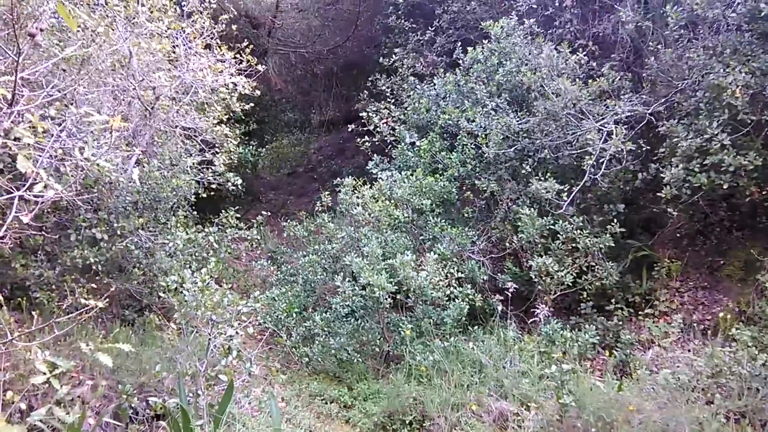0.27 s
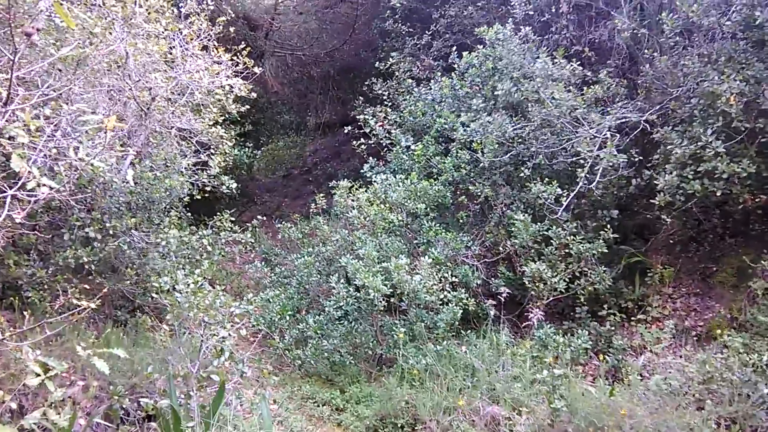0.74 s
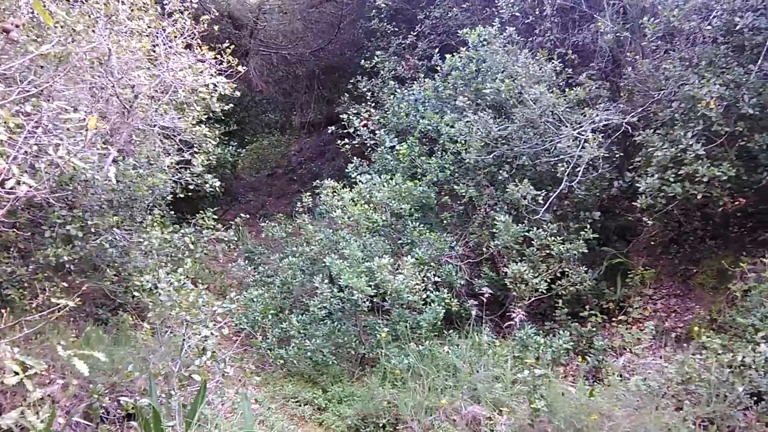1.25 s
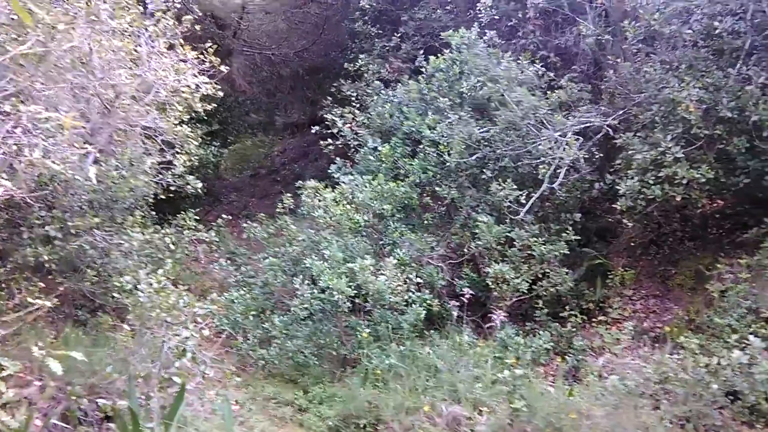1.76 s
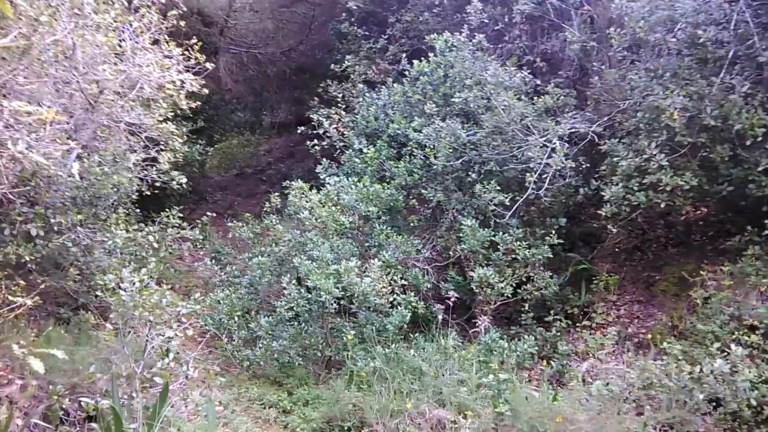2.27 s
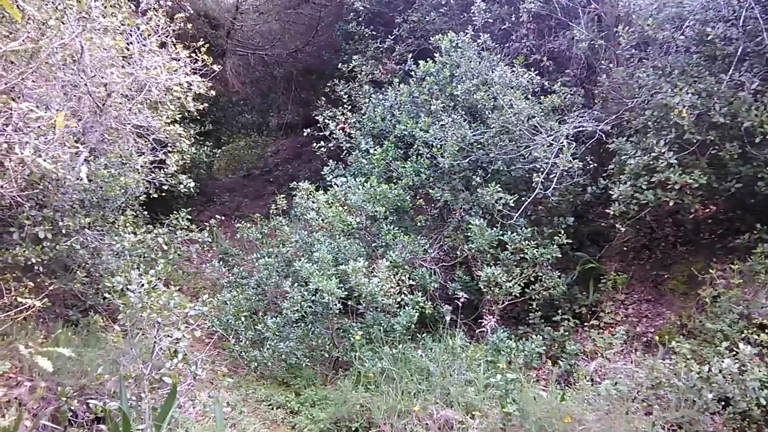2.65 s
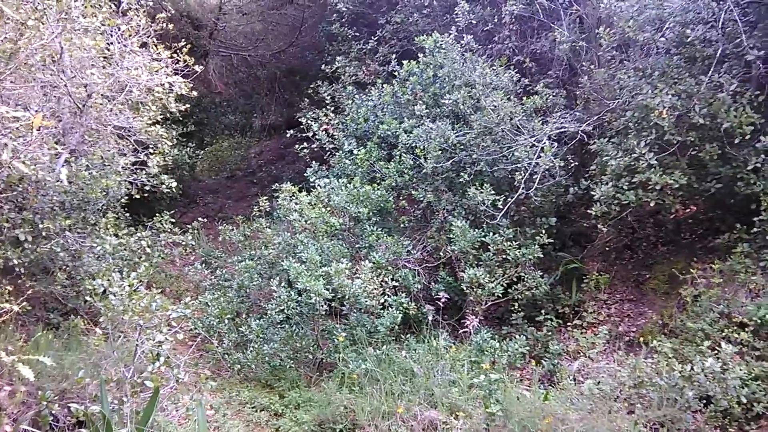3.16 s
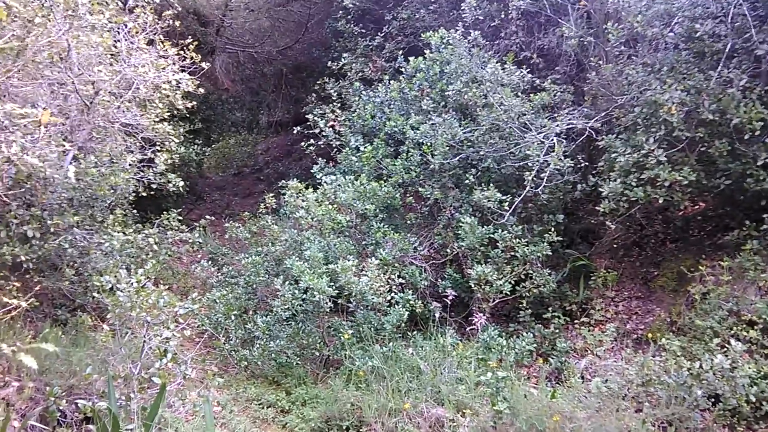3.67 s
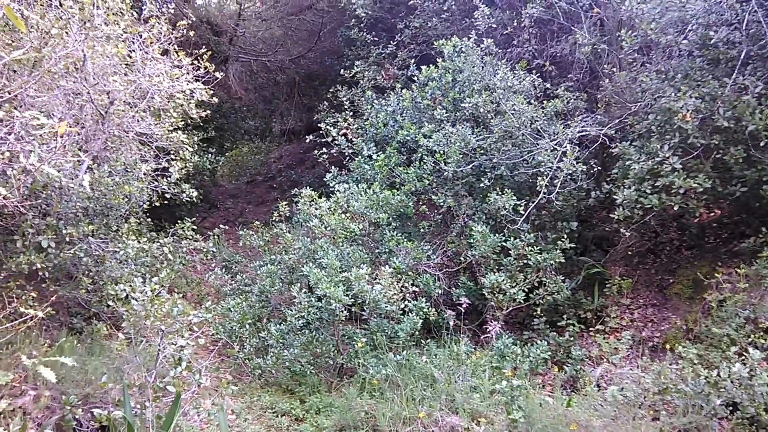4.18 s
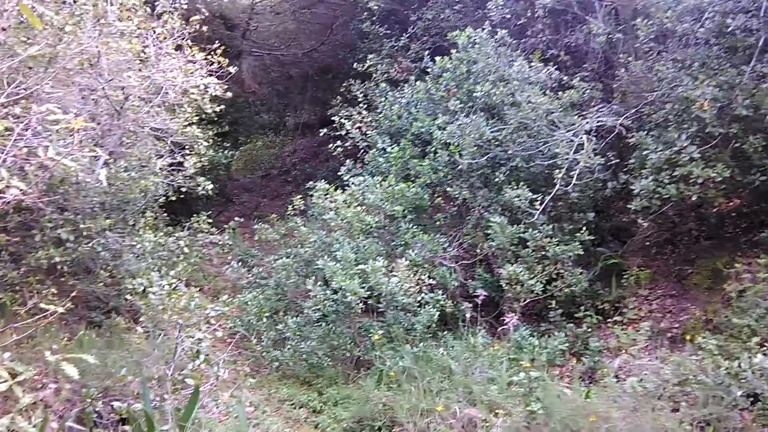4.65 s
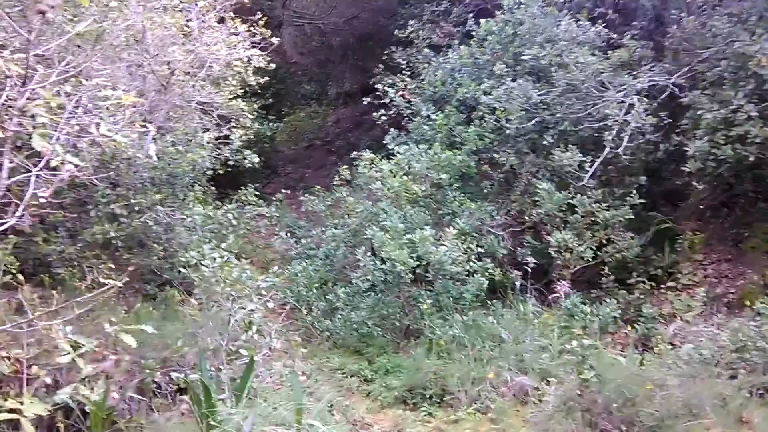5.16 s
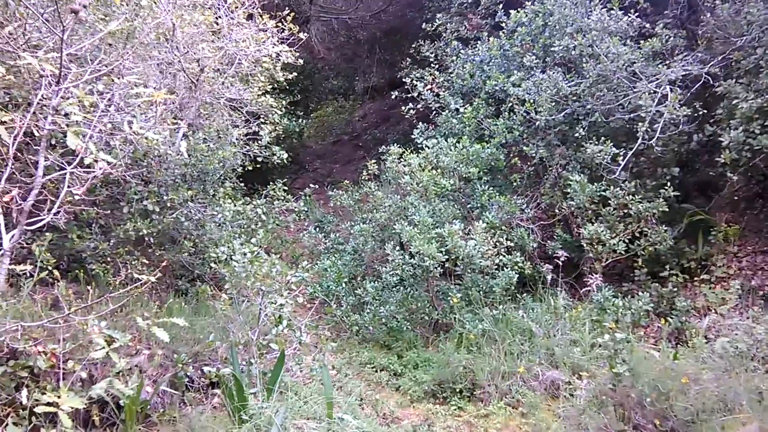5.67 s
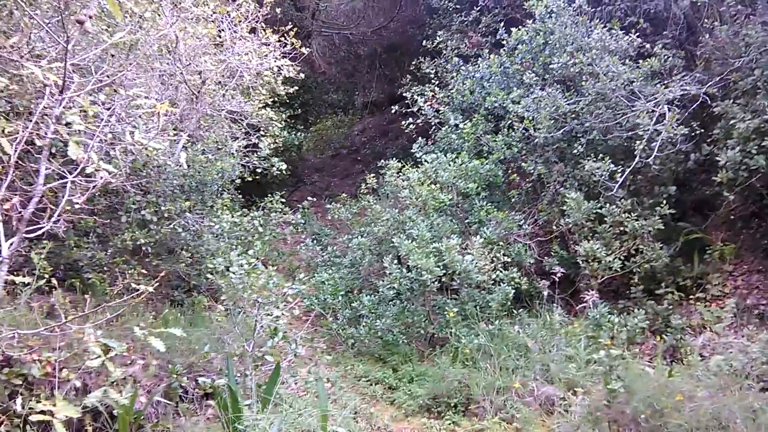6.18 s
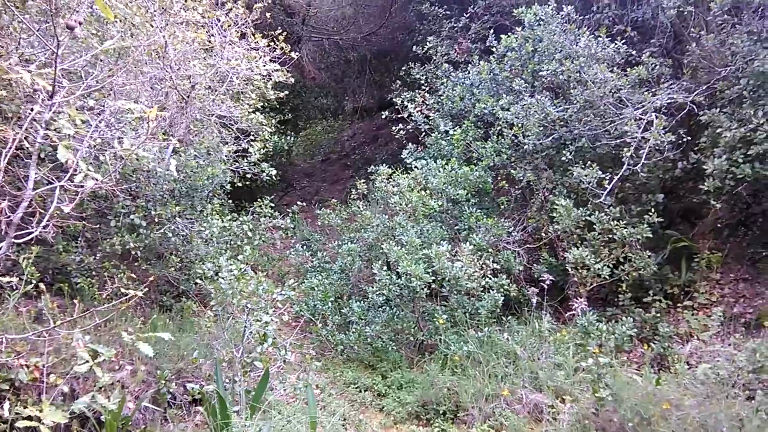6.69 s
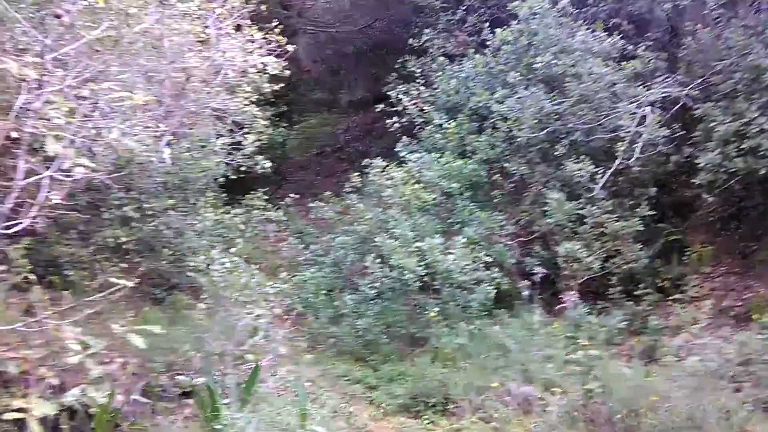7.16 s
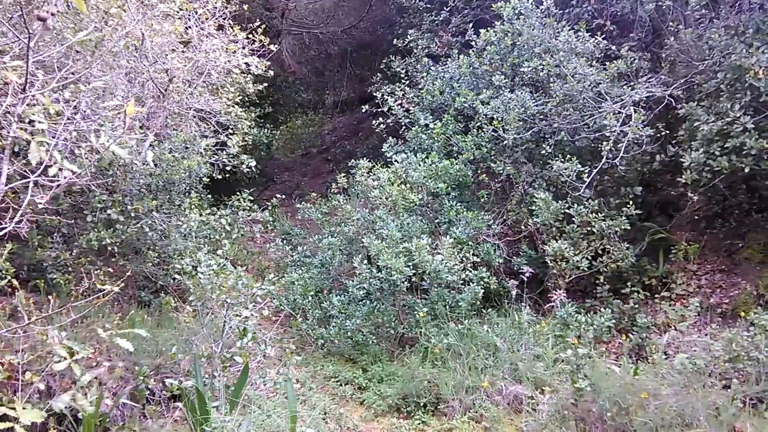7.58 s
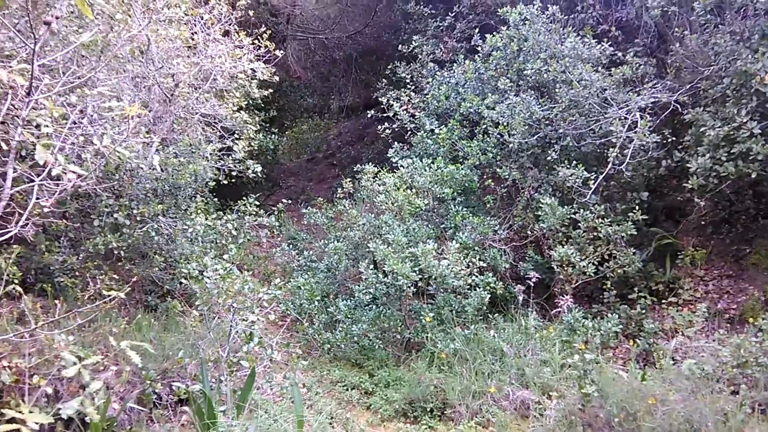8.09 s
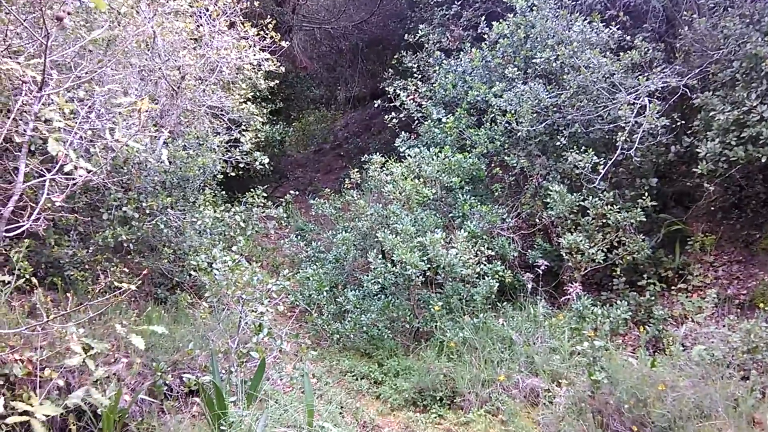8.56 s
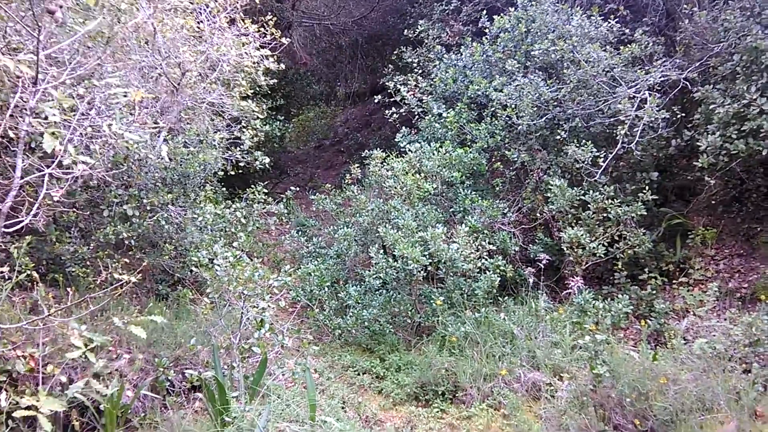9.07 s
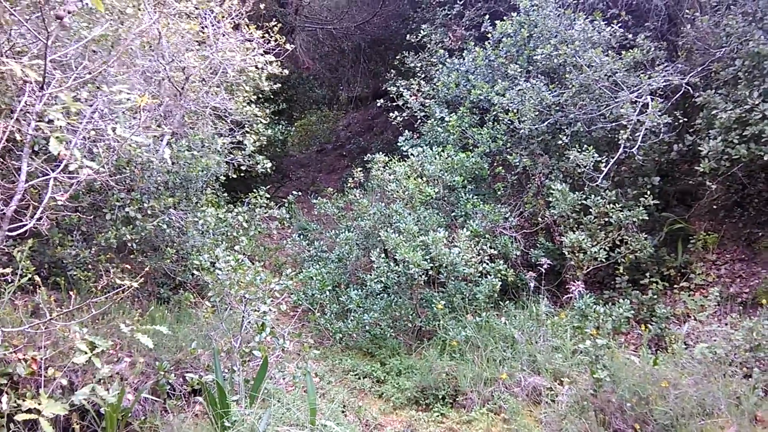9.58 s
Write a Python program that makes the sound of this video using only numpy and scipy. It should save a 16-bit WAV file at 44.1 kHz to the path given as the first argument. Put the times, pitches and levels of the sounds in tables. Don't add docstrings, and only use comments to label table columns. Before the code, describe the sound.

Scrubland, handheld bare microphone. From 0 to 1.4 s there is only soft, dull valley air, slight low rumble, tiny leaf ticks and a thin far chirp at 0.8. At 1.4 a distant hound squeals and breaks into a hoarse bark, again at 1.95, with fainter cries around 2.4 and 2.75. From 3.2 a lower, rougher hound joins; short yelps, roughly 0.1 to 0.3 s long, come in quick clusters through 7 s, clearing to brief steady notes and trailing a half-second woodland echo. Close dry leaves hiss and tick more from 3.5 onward. Wind puffs stir near 6, thump at 7.05, then batter the microphone from 7.45 to 8.65 with deep distorted blows and sharp cracks, worst at 7.6 and 7.8, partly covering barks. The gust subsides; a low chirp at 8.7 and high bays at 8.9 and 9.3 finish over rustling leaves and fading rumble until 9.8.

```python
import sys
import numpy as np
from scipy import signal
from scipy.fft import rfft, irfft
from scipy.io import wavfile
from scipy.ndimage import uniform_filter1d

SR = 44100
rng = np.random.default_rng(int(sys.argv[2]) if len(sys.argv) > 2 else 0)


def volts_from_decibels(level):
    exponent = np.asarray(level, float) / 20
    return 10 ** exponent


def wav_out(sig):
    wavfile.write(sys.argv[1], SR, np.round(np.clip(np.atleast_2d(sig).T, -1, 1) * 32767).astype(np.int16))


N = 433503


def level(x, db=0):
    return x * volts_from_decibels(db) / np.sqrt(np.mean(x ** 2))


def walk(rate, size):
    hold = max(int(SR / rate), 1)
    steps = np.repeat(rng.standard_normal(size // hold + 2), hold)
    return level(uniform_filter1d(uniform_filter1d(steps, hold), hold)[:size])


def butter(x, hz, kind, order=2):
    return signal.sosfilt(signal.butter(order, hz, kind, fs=SR, output="sos"), x)


def band_noise(hz, order=2):
    return butter(rng.standard_normal(N), hz, "band", order)


def coloured(spectrum):
    hz, db = np.transpose(spectrum)
    f = np.maximum(np.fft.rfftfreq(N, 1 / SR), 1)
    gain = volts_from_decibels(np.interp(np.log(f), np.log(hz), db))
    return level(irfft(rfft(rng.standard_normal(N)) * gain, N))


def spread(start, length, peak, fade, *columns):
    t = np.arange(0, length, 1 / SR)
    edge = np.clip(np.minimum(t, length - t) / fade, 0, 1)
    curves = [np.interp(t, [0, peak, length], c) for c in columns]
    return int(start * SR), np.sin(np.pi / 2 * edge) ** 2, curves


def phase(hz):
    return 2 * np.pi * np.cumsum(hz) / SR


def add(out, start, x):
    out[start:start + len(x)] += x[:len(out) - start]


# start_s, length_s, peak_pitch_hz, end_pitch_hz, level_db
SCOOPED_SQUEALS = [(1.385, 0.092, 1402, 1358, -31), (2.395, 0.11, 1342, 1290, -39),
                   (2.715, 0.11, 1393, 1410, -35), (2.77, 0.13, 1525, 1516, -43),
                   (3.77, 0.025, 960, 970, -41.5), (4.255, 0.047, 992, 990, -32),
                   (5.097, 0.047, 996, 985, -27), (6.903, 0.05, 1010, 943, -29.5),
                   (6.645, 0.069, 938, 648, -24.5), (6.47, 0.074, 847, 850, -45.5),
                   (8.695, 0.047, 990, 850, -45), (9.33, 0.056, 1487, 1390, -36)]
# start_s, length_s, peak_pitch_hz, end_pitch_hz, level_db
LEAPING_SQUEALS = [
    (1.938, 0.063, 1498, 1470, -32.5),
    (7.43, .12, 1633, 1348, -26),
    (8.856, 0.1, 1499, 1360, -33),
]
# start_s, length_s, peak_pitch_hz, end_pitch_hz, level_db
SLIDING_SQUEALS = [(3.155, 0.051, 1287, 1120, -40), (4.025, 0.046, 1183, 795, -37),
                   (4.285, 0.053, 1420, 1260, -35.5), (4.68, 0.036, 854, 806, -42.5),
                   (4.695, 0.11, 1500, 1220, -34), (5.12, 0.041, 1443, 1390, -34.5),
                   (5.592, 0.043, 955, 885, -31.5), (6.075, 0.06, 825, 702, -30),
                   (6.19, 0.05, 795, 600, -33), (3.528, 0.03, 1280, 1160, -42.5),
                   (7.315, 0.025, 1580, 1640, -37.5), (8.228, 0.026, 1150, 1010, -44)]


def squeals():
    out = np.zeros(N)
    # table, opening pitch as a share of the peak pitch, octave trim in dB
    kinds = ((SCOOPED_SQUEALS, .93, 0), (LEAPING_SQUEALS, .88, 0), (SLIDING_SQUEALS, 1.13, -3))
    for table, opening, dull_db in kinds:
        for s, length, peak_hz, end_hz, peak_db in table:
            peak_s = min(0.402 * length, 0.0376)
            start, edge, (hz, db, octave_db) = spread(
                s, length, peak_s, .007,
                (opening * peak_hz, peak_hz, end_hz),
                peak_db + np.array([-11.5, 0, -12]),
                dull_db + np.array([-18, -8, -18]))
            size = len(hz)
            turn = phase(hz * (1 + 0.014 * walk(161, size)))
            upper = volts_from_decibels(octave_db) * np.sin(2 * turn) + volts_from_decibels(-37) * np.sin(3 * turn)
            distance_db = -22 if peak_db < -42 else 0
            tone = volts_from_decibels(db) * (np.sin(turn) + volts_from_decibels(distance_db) * upper)
            add(out, start, bushes(np.sqrt(2) * edge * tone * volts_from_decibels(3.07 * walk(119.3, size))))
    return out


# start_s, length_s, pitch_hz, level_db, bite_db
HIGH_BARKS = [
    (1.44, 0.12, 670.4, -28.5, -12.5),
    (3.178, .15, 707, -36.5, -4.5),
    (3.538, 0.1094, 737, -32.5, -15),
    (4.28, 0.068, 718, -47, 7),
    (4.7, 0.16, 699, -39.5, 0.5),
    (6.19, 0.076, 720, -45, 10),
    (6.67, .07, 700, -42.5, 10),
    (1.97, 0.082, 687, -33.5, -0.5),
    (7.47, 0.12, 685, -33, 2.5),
]
# start_s, length_s, pitch_hz, level_db, bite_db
HELD_BAYS = [
    (2.77, 0.063, 745, -43, -14),
    (8.885, 0.14, 688.4, -33.5, -2),
    (9.305, 0.1756, 724, -32, -4),
]
# start_s, length_s, pitch_hz, level_db, bite_db
LOW_BARKS = [(3.545, 0.13, 603, -42.5, 2.5), (3.78, 0.18, 598, -43.5, -6), (4.032, .16, 587, -36, -2),
             (4.28, 0.16, 600.6, -39.5, -7.5), (4.71, 0.19, 521.6, -48.5, 3), (5.12, 0.18, 593, -34, -3.5),
             (5.6, 0.28, 576.5, -37, 0), (6.085, 0.124, 564.5, -41, 5.5), (6.195, 0.14, 562.6, -38, -6),
             (6.922, 0.17, 547.3, -36.5, -0.5), (4.785, .13, 540.6, -42.5, 5)]
# start_s, length_s, pitch_hz, level_db, bite_db
BAYS = [
    (2.41, 0.19, 606, -48, -15),
    (3.18, 0.17, 566, -43, 6),
    (7.308, 0.17, 581, -44, 8),
    (7.75, 0.14, 589.6, -43, 7.5),
    (8.225, 0.11, 581.4, -36, 5),
    (6.52, 0.15, 585, -39.5, 0.5),
    (6.675, 0.14, 579.5, -40, 1.5),
]
# hoarseness (0-1), opening_pitch (share), opening_chest_db, closing_chest_db,
# peak (share of length), opening_db, closing_db
HIGH_VOICE = (0.9, 1.18, -9, -7, 0.22, -9.5, -12.5)
HELD_VOICE = (1, 1.21, 4.5, -12.5, 0.5, -10, -3)
LOW_VOICE = (1, 1, -0.5, -4.5, 0.48, -6.5, -10.5)
BAY_VOICE = (1.03, 0.87, 1.5, -8.5, 0.33, -1.5, -11)
THROAT = [1, 2, 3, 4, 5.2, 6.4, 9]


def barks():
    out = np.zeros(N)
    kinds = ((HIGH_BARKS, HIGH_VOICE), (HELD_BAYS, HELD_VOICE), (LOW_BARKS, LOW_VOICE), (BAYS, BAY_VOICE))
    for table, kind in kinds:
        roughness, opening_share, chest_from_db, chest_to_db, peak_share, from_db, to_db = kind
        for s, length, peak_hz, peak_db, peak_bite_db in table:
            start, edge, (hz, db, chest_db, bite_db) = spread(
                s, length, peak_share * length, .02,
                peak_hz * np.array([opening_share, 1, .97]),
                peak_db + np.array([from_db, 0, to_db]),
                (chest_from_db, (chest_from_db + chest_to_db) / 2, chest_to_db),
                peak_bite_db + np.array([8, 0, -3.5]))
            size = len(hz)
            age = np.arange(size) / SR
            hoarse = min(roughness, 1) * np.interp(np.linspace(0, 1, size), [0, .45, 1], [1, .9, .5])
            drop_in = .15 * np.exp(-age / .018)
            turn = phase(hz * (1 + drop_in + .064 * hoarse ** 2 * walk(190, size)))
            colour = np.array([chest_db, 0 * db, bite_db, bite_db - 8.0,
                               bite_db - 23, bite_db - 24.5, bite_db - 14.0])
            voice = 0
            for k in np.arange(1, 9, .5):
                place = np.interp(k, THROAT, np.arange(len(THROAT)))
                below = min(int(place), len(THROAT) - 2)
                colour_db = colour[below] + (place - below) * (colour[below + 1] - colour[below])
                gain = volts_from_decibels(colour_db + 3.16 * walk(25.4, size))
                rough = hoarse * min(k / 2, 1)
                flutter = np.sqrt(1 - rough ** 2) + rough * walk(290, size)
                opening = np.clip(age / (.007 * k), 0, 1)
                half_line = 1.1 * hoarse ** 2 if k % 1 else 1
                voice = voice + gain * opening * flutter * half_line * np.sin(k * turn + k * k)
            add(out, start, bushes(edge * volts_from_decibels(db - 2.0) * voice))
    return out


# start_s, length_s, pitch_hz, chest_db, mouth_db
CLEAR_ENDS = [(1.46, 0.089, 540, -72, -39.5), (1.715, 0.185, 500, -65.5, -59.5), (2.4, .17, 574, -54, -52),
              (2.77, 0.099, 760, -64, -45), (2.485, 0.084, 585, -50.5, -46.5),
              (2.715, 0.077, 802, -50.5, -72), (2.43, 0.071, 830, -54, -72), (3.27, 0.093, 599, -52, -46),
              (3.61, 0.073, 600, -76, -40.5), (4.1, 0.066, 583, -57, -38), (4.32, 0.11, 585, -52, -46.5),
              (5.23, 0.12, 561.4, -46, -48), (5.76, 0.11, 565, -46.5, -48), (6.22, .12, 551, -48, -50),
              (6.705, 0.07, 586.4, -37, -59), (6.96, .12, 567.5, -45, -41),
              (7.34, 0.081, 576, -39.5, -44.5), (8.29, 0.067, 550, -43, -40.5),
              (9.37, 0.1, 730, -42.5, -42)]
# start_s, length_s, pitch_hz, chest_db, mouth_db
WIDE_NOTES = [(1.97, 0.069, 693, -53, -50), (1.44, .06, 700, -51, -52), (5.61, 0.073, 680, -60, -50),
              (6.09, 0.095, 600, -61, -51), (3.8, 0.1, 582.5, -56.5, -52.5), (4.77, 0.11, 537, -50, -48.5),
              (4.86, 0.053, 600, -52, -44), (5.16, 0.12, 584, -51, -46.5), (5.66, 0.11, 586, -45.5, -48.5),
              (6.54, 0.083, 594, -45, -53), (6.72, 0.073, 563, -46, -54), (7.49, 0.069, 661, -50, -42.5)]
# start_s, length_s, pitch_hz, chest_db, mouth_db
SHOUTED_NOTES = [
    (3.185, 0.098, 560, -49.5, -47),
    (3.56, 0.096, 580, -62, -51),
    (4.07, 0.055, 576, -62, -50),
    (7.77, .11, 571, -44, -50.5),
    (8.25, 0.061, 570, -43, -48),
    (8.96, 0.094, 673, -65, -47.5),
    (6.74, 0.089, 650, -64, -57),
    (4.8, .09, 700, -62, -53.5),
]


def notes():
    out = np.zeros(N)
    kinds = ((CLEAR_ENDS, (-20.5, -21, -31.5)), (WIDE_NOTES, (-1.5, -8.5, -16.5)), (SHOUTED_NOTES, (6, -5, -9.5)))
    for table, top_db in kinds:
        for s, length, pitch_hz, chest_db, mouth_db in table:
            sag = pitch_hz * np.array([1 / .98, 1, .98])
            start, edge, (hz,) = spread(s, length, length / 2, .025, sag)
            size = len(hz)
            turn = phase(hz * (1 + .017 * walk(120, size)))
            note = np.zeros(size)
            for k, db in enumerate([chest_db, mouth_db, *(mouth_db + np.array(top_db))], 1):
                note += volts_from_decibels(db + 4 + 3.5 * walk(70, size)) * np.sin(k * turn)
            add(out, start, edge * note)
    return out


# start_s, length_s, pitch_hz, level_db
OVERTONES = [(1.418, 0.072, 4100, -60), (1.452, 0.089, 4500, -65), (1.95, 0.079, 4420, -61),
             (1.965, 0.066, 5100, -67), (1.955, 0.054, 5950, -71), (4.272, 0.085, 3200, -52),
             (4.72, 0.066, 3500, -56), (5.126, 0.086, 3300, -56), (5.689, 0.064, 3300, -56),
             (6.194, .07, 3280, -58), (6.675, .06, 3400, -59), (6.918, 0.038, 3030, -53),
             (3.178, 0.046, 4400, -69), (7.445, 0.036, 4830, -53.5), (7.532, 0.071, 5040, -57),
             (8.69, 0.04, 4700, -63), (8.969, 0.098, 3386, -52.5), (9.365, 0.096, 3500, -54.5)]


def overtones():
    out = np.zeros(N)
    for s, length, pitch_hz, db in OVERTONES:
        size = int(length * SR)
        turn = phase(pitch_hz * (1 + .01 * walk(100, size)))
        flutter = walk(600, size) * np.sin(turn) + walk(600, size) * np.cos(turn)
        add(out, int(s * SR), np.hanning(size) * volts_from_decibels(db + 2) * flutter)
    return out


def swaying(rate, size):
    return np.sqrt(.5) + np.sqrt(.5) * walk(rate, size)


def bushes(cry):
    t60_s = 0.24
    t = np.arange(int(t60_s * SR)) / SR
    echo = level(rng.standard_normal(len(t)) * volts_from_decibels(-60 * t / t60_s), -1.5) / np.sqrt(len(t))
    smear = signal.fftconvolve(cry * swaying(120, len(cry)), echo)
    add(smear, 0, cry)
    return smear / np.sqrt(2)


def scrub(x):
    return butter(x, 3500, "low", order=8) + volts_from_decibels(-13) * butter(x, (4100, 5100), "band", order=3)


def wood(x):
    t60_s = 0.52
    t = np.arange(int(1.2 * SR)) / SR
    scatter = rng.standard_normal(len(t)) * volts_from_decibels(3 * walk(40, len(t))) * (1 - np.exp(-t / .015))
    low = butter(scatter, 2170, "low", order=1)
    tail = low * volts_from_decibels(-60 * t / t60_s) + (scatter - low) * volts_from_decibels(-60 * t / (.7 * t60_s))
    echo = level(tail, -11) / np.sqrt(len(t))
    return x + signal.fftconvolve(x * swaying(150, N), echo)[:N]


# time_s, rumble_db
BREEZE = [(0, -50.5), (.3, -45.5), (1.3, -51), (1.75, -56), (2.55, -53), (3.2, -55.5), (3.5, -45),
          (4.05, -56), (5.55, -53), (6.1, -37), (6.5, -39), (6.75, -83), (7.3, -40), (8.2, -23.5),
          (8.72, -37.5), (9.3, -36.5), (9.83, -47)]
# peak_s, rumble_db, rise_s, fall_s, flutter_db
PUFFS = [(5.903, -30, 0.023, 0.16, -7.5), (6.152, -27.5, 0.22, 0.38, -6.5), (6.842, -17, 0.099, 0.036, -33),
         (7.055, -8.5, 0.049, 0.026, -26), (7.21, -20.5, 0.79, 0.38, -29), (7.482, -6.5, 0.048, 0.28, 0.5),
         (7.601, 1, 0.18, 0.015, 0), (7.666, -14, 0.071, 0.11, 12), (7.718, -3.5, 0.025, 0.24, 1),
         (7.804, -7, 0.4, 0.25, -17), (8.029, -13, 0.073, 0.1, 5), (8.15, -18, 0.038, 0.23, -5.5),
         (8.27, -27, 0.23, 0.045, -17), (8.328, -6, 0.036, 0.027, -18), (8.452, -7, 0.088, 0.097, -7),
         (8.55, -6, 0.03, 0.11, -3.5), (8.623, -8.5, 0.32, 0.12, -10.5), (8.88, -23, .1, 0.075, -26),
         (9.048, -34, 0.06, 1, -30)]


def wind():
    t = np.arange(N) / SR
    push = volts_from_decibels(np.interp(t, *np.transpose(BREEZE)))
    flap = push * volts_from_decibels(-37)
    for s, puff_db, rise, fall, lump_db in PUFFS:
        puff = volts_from_decibels(puff_db - 32 * np.maximum((s - t) / rise, (t - s) / fall))
        push = np.maximum(push, puff)
        flap = np.maximum(flap, puff * volts_from_decibels(lump_db))
    db = 20 * np.log10(push)
    strong = np.clip((db + 44.0) / 15, 0, 1)
    deep = level(band_noise([35, 72]))
    big = level(band_noise([60, 115]))
    lumps = band_noise([100, 330], order=1) * volts_from_decibels(5 * walk(45, N))
    small = level(butter(lumps, 480, "low", order=4), -5)
    eddies = (1.5 - 1.1 * strong) * deep + strong * (big + flap / push * small)
    rumble = volts_from_decibels(db - 3) * level(volts_from_decibels(2.5 * walk(22, N))) * eddies
    spit = volts_from_decibels(-52 + 4 * walk(60, N)) * np.clip(flap, 0, 1) * level(band_noise((2554, 7900)))
    return spit + rumble


# time_s, peak_db, width_ms
SLAPS = [(7.03, -11, 2.2), (7.046, -10, 1.33), (7.222, -17.5, 1.28), (7.47, -18, 1.2), (7.5, -15, 0.46),
         (7.556, -9.5, 0.41), (7.56, -5.5, 1.4), (7.569, -14, 0.43), (7.585, -3, 0.7), (7.637, -0.5, 1.46),
         (7.67, -9, 1.1), (7.683, -7.5, 0.61), (7.724, -16, 1.8), (7.736, -20, 0.84), (7.786, 1.5, 0.95),
         (7.847, -16.5, 0.32), (7.862, -8.5, 1.13), (7.904, -8, 1.35), (8.01, -12, 1.03),
         (8.033, -13, 0.89), (8.166, -14.5, 1.8), (8.186, -15.5, 1.27), (8.325, -6.5, 1.87),
         (8.332, -14.5, 0.57), (8.398, -14, 0.93), (8.406, -10, 0.42), (8.418, -10, 0.72),
         (8.443, -9.5, 0.56), (8.484, -14, 0.85), (8.49, -13, 0.8), (8.543, -6, 1.36), (8.552, -9.5, 0.87),
         (8.581, -13, 0.9), (8.597, -18, 1.8), (8.618, -13, 0.64)]
# time_s, peak_db
CRACKS = [(7.5603, -8.5), (7.5879, -12.5), (7.634, -16), (7.67, -10.5), (7.791, -3.5), (7.597, -20),
          (7.6409, -25), (7.798, -21), (8.4416, -15), (8.4502, -19), (8.546, -17.5), (8.5523, -26.5)]


def slaps():
    out = np.zeros(N)
    ms = np.arange(-10, 20, 1000 / SR)
    signs = rng.choice([-1, 1, 1], len(SLAPS))
    for (s, db, width), sign in zip(SLAPS, signs):
        peak, rebound = (np.exp(-np.sqrt(((ms - lag) / max(width, .3)) ** 2 + .2))
                         for lag in (0, 2.5 * width))
        add(out, int((s - .008) * SR), sign * volts_from_decibels(db + 14.5) * (peak - 0.24 * rebound))
    for s, db in CRACKS:
        add(out, int((s - .009) * SR), volts_from_decibels(db + 12) * np.exp(-np.sqrt((ms / .3) ** 2 + .05)))
    return butter(out, 103, "high", order=3)


# time_s, level_db
RUSTLE = [(0, -78), (.5, -71.5), (1.28, -80), (1.32, -72), (2.2, -70), (2.3, -78), (2.325, -67),
          (2.44, -70.5), (2.85, -73.5), (3.3, -67), (3.52, -60.5), (4.1, -57), (4.3, -59), (5.7, -61),
          (6.15, -59), (7.4, -58.5), (7.6, -60), (8.651, -61.5), (9.15, -65.5), (9.31, -58.5), (9.83, -73)]
# frequency_hz, density_db (per Hz)
LEAF_COLOUR = [(2240, -12.5), (3800, -14.5), (4580, -9.5), (6450, -12.5), (8610, -3), (10500, -4),
               (13800, -9), (15800, -20.5)]
# time_s, peak_db
TICKS = [(0.2293, -55), (0.3127, -48.5), (0.8173, -57), (1.4414, -51), (1.711, -52), (2.3232, -34),
         (2.345, -48), (2.365, -49), (2.587, -53), (3.4057, -51), (3.499, -51), (3.9664, -52), (4.436, -39),
         (4.5161, -39), (4.5734, -43), (4.7217, -38), (4.8359, -33.5), (5.2021, -42), (5.2485, -41.5),
         (5.3868, -34.5), (5.556, -48), (5.6166, -37), (5.6384, -33), (5.9085, -39.5), (6.1424, -37.5),
         (6.2652, -39.5), (6.7022, -34), (7.417, -43.5), (7.672, -36.5), (7.899, -35), (7.9917, -53),
         (8.2486, -45), (8.4253, -46), (8.8396, -40), (9.1925, -39.5), (9.3048, -44), (9.3596, -40.5),
         (9.4592, -36.5), (9.7032, -49), (9.7306, -47.5), (9.7535, -41.5)]


def leaves():
    grains = (rng.random(N) < 900 / SR) * volts_from_decibels(2.4 * rng.exponential(1, N) + 1.54 * walk(7.9, N))
    grains = signal.lfilter([1], [1, -.97], grains)
    stir_db = np.interp(np.arange(N) / SR, *np.transpose(RUSTLE)) + 2 * walk(8, N)
    hiss = level(coloured(LEAF_COLOUR) * (1 + .25 * grains)) * volts_from_decibels(stir_db)
    t = np.arange(int(.1 * SR)) / SR
    decay = np.exp(-t / 0.0024) + 0.36 * np.exp(-t / 0.037)
    ticks = np.zeros(N)
    for s, db in TICKS:
        add(ticks, int(s * SR), volts_from_decibels(db - 7.5) * rng.standard_normal(len(t)) * decay)
    return hiss + butter(ticks, [6500, 15700], "band") + volts_from_decibels(-13) * butter(ticks, [2500, 6000], "band")


# start_s, pitch_hz, level_db
CHIRPS = [
    (.83, 4700, -67),
    (2.72, 5000, -72),
    (2.42, 4300, -71),
    (2.925, 3340, -65),
    (8.721, 2970, -55),
]


def bird():
    out = np.zeros(N)
    chirp_s = 0.034
    t = np.arange(0, chirp_s, 1 / SR)
    for s, hz, db in CHIRPS:
        add(out, int(s * SR), volts_from_decibels(db) * np.sin(np.pi * t / chirp_s) * np.sin(2 * np.pi * hz * t))
    return out


# frequency_hz, density_db (per Hz)
VALLEY_COLOUR = [(110, -13.5), (180, -2), (280, -1), (736, -3.5), (1250, -11), (1910, -17.5), (6000, -39.5),
                 (9000, -82.5)]
# time_s, level_db
FAR_SWELL = [(0, 3), (1.2, 4.5), (3, 3), (5.5, 3), (9.83, -3)]


def valley():
    swell_db = np.interp(np.arange(N) / SR, *np.transpose(FAR_SWELL))
    return coloured(VALLEY_COLOUR) * volts_from_decibels(-61 + swell_db + 0.55 * walk(3.0, N))


def scene():
    cries = scrub(squeals() + barks() + notes())
    far = wood(cries + bird() + overtones())
    return (far + wind() + slaps() + leaves() + valley())[None]


def roll_off(x):
    return signal.sosfilt(signal.butter(12, 15400, fs=SR, output="sos"), x)


def record(dry):
    hiss = level(butter(rng.standard_normal(N), 12000, "high"), -86)
    x = butter(dry + hiss, 49, "high", order=4)
    x = x / (1 + np.abs(x) ** 4) ** (1 / 4)
    return roll_off(x)


dry = scene()
out = record(dry)
wav_out(out)
```